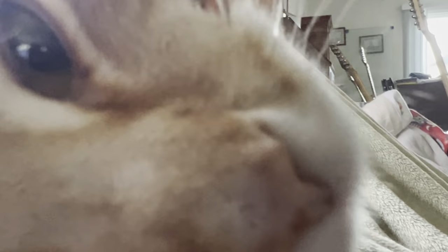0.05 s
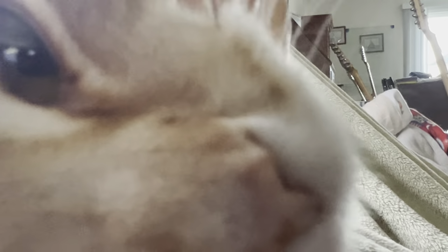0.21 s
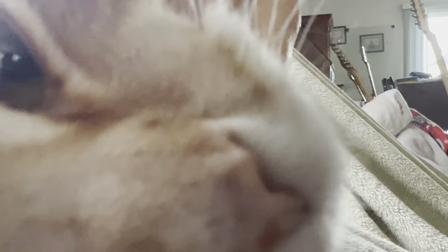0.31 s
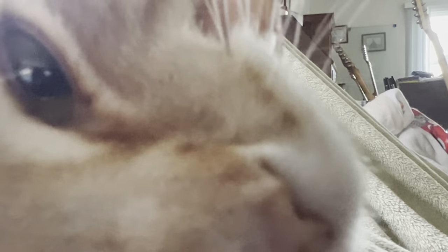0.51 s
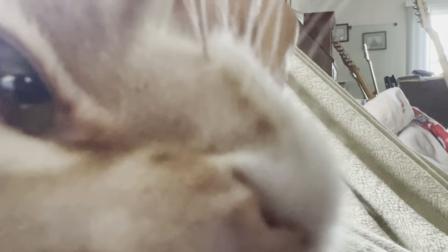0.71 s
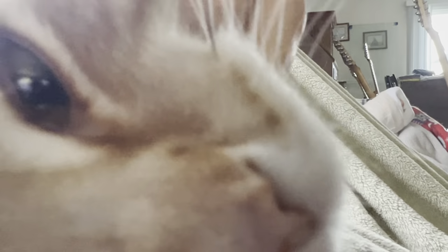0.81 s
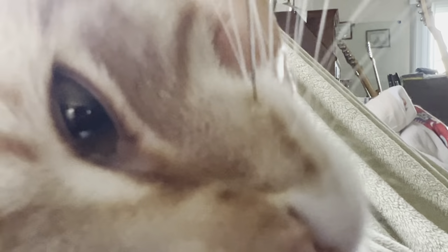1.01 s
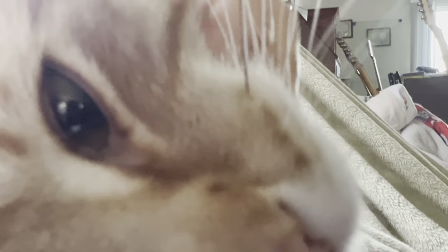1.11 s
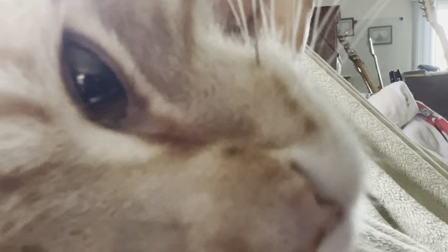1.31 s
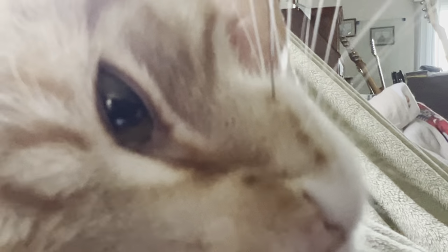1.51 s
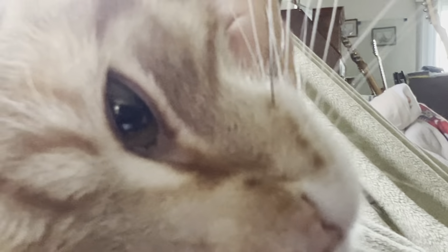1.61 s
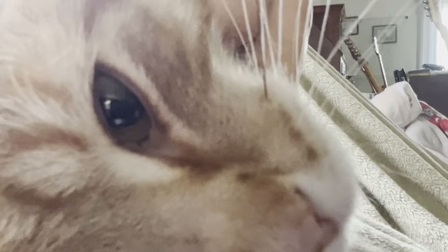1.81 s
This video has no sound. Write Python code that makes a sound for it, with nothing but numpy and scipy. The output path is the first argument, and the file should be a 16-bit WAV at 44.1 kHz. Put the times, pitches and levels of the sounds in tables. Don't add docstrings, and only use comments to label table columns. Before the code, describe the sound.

A cat purrs with its muzzle at the microphone: a soft bump, then a rapid low throaty rattle that fades within a second, a pause with faint sniffing and room rumble, then a short weaker purr.

```python
import sys
import numpy as np
from scipy import signal
from scipy.fft import rfft, irfft, next_fast_len
from scipy.io import wavfile
from scipy.ndimage import uniform_filter1d

SR = 44100
rng = np.random.default_rng(int(sys.argv[2]) if len(sys.argv) > 2 else 0)


def store_wav(level_fs):
    pcm = np.round(np.clip(np.atleast_2d(level_fs), -1, 1) * 32767)
    wavfile.write(sys.argv[1], SR, pcm.T.astype(np.int16))


def magnitude_from_level(level_db):
    exponent = np.asarray(level_db, float) / 20
    return 10 ** exponent


N = 83790
T = np.arange(N) / SR

# f/Hz, level/dB per Hz
ROOM_SPECTRUM = [(12, -35), (20, -11.5), (60, -1), (139, -8), (240, -14), (345, -19), (775, -37),
                 (967, -32.5), (2500, -45.5), (3250, -44.5), (5500, -120)]
# f/Hz, left minus right/dB
ROOM_BALANCE = [(60, 1.5), (200, 3), (700, 1.5), (1300, 0), (2400, 2.5)]
# f/Hz, left minus right/dB
CAT_BALANCE = [(60, 0), (125, 2), (300, 2), (600, 8), (1100, 7.5), (2000, 4), (4000, 2), (8000, 0)]
# f/Hz, lead of right port/rad
PORT_PHASE = [(1500, 0), (3000, 1.1), (4600, .35), (7300, .15), (8600, 1.6), (9600, 3.0), (10600, 3.3),
              (13000, 6.1), (14200, 6.6), (15700, 8.6)]
# peak t/s, level/dB, rise to peak from -20 dB/s, fall by 20 dB/s
SNIFFS = [(-.01, -67.5, 0.033, 0.099), (.2, -68, 0.058, 0.073), (0.272, -62, 0.075, 0.15),
          (0.502, -63, 0.16, 0.12), (0.713, -62.5, 0.11, 0.1), (.94, -64, 0.059, 0.092),
          (1.158, -66, 0.078, 0.13), (1.434, -69, 0.092, 0.1), (1.689, -69.5, 0.076, 0.12),
          (1.91, -81.5, 0.12, .1)]
# f/Hz, level/dB per Hz
SNIFF_SPECTRUM = [(1800, -8), (2500, -9.5), (5000, -15), (7500, -13.5), (9000, -8.5), (11500, -5),
                  (14000, -13.5), (15700, -1.5)]
# t/s, level/dB, f/Hz
THUMPS = [
    (.2325, -20, 192),
    (.170, -65, 100),
    (.526, -42, 125),
    (1.829, -42, 39),
    (1.7, -58, 230),
]
# t/s, level/dB
TICKS = [
    (0.167, -60),
    (0.667, -62),
    (1.426, -77),
    (1.8985, -55),
]
# t/s, level/dB
CHEST_LEVEL = [(0.12, -61.5), (0.308, -42.5), (0.494, -37), (0.512, -37.5), (0.706, -54), (0.762, -49),
               (0.8, -101)]
# multiple of twitch rate, level/dB, lag/turns
CHEST_ORDERS = [(1.0, -7.5, 0.083), (2.0, 1, 0.16), (3.0, -8, 0.24), (4.0, -11.5, 0.048), (5.0, -9, 0.14),
                (6.0, -2, 0.085)]
# t/s, level/dB
AIRFLOW = [(.15, -71), (.25, -36), (.38, -32.5), (.48, -32), (.6, -35.5), (.66, -34.5), (.72, -43),
           (1.9, -60)]
# f/Hz, width/Hz, level/dB
AIRWAY = [(2040, 310, -24), (3290, 390, -28.5), (4176, 260, -28), (5220, 950, -37.5), (7450, 980, -31),
          (12700, 10000, -49)]
# f/Hz, width/Hz, level/dB
THROAT = [(332, 214.3, -1), (200, 225, -5)]
# f/Hz, width/Hz, level/dB
NOSE = [(769.5, 167, -5.5), (1088, 300, -12.5), (633, 203, -4.5)]
# first twitch t/s, twitch period/s, twitches
BREATHS = [
    (0.154, .0311, 19),
    (1.797, .034, 3),
]
# t/s, flutter f/Hz, throat level/dB, nose level/dB, open share of period
VOICE = [
    [(.15, 649, -60, -61.5, 0.67), (.19, 774.6, -60, -55.5, 0.4), (.222, 635, -73, -53.5, .4),
     (.246, 430.5, -31.5, -44.5, .95), (.285, 329.4, -30.5, -48.5, .95), (.5, 344.8, -34.5, -53.5, 1.05),
     (.6, 320.2, -38, -51.5, .95), (.69, 290.3, -39, -51, .7), (.73, 225.6, -59, -72, 0.9)],
    [(1.79, 490.4, -61, -75, 0.48), (1.84, 506.6, -43, -58.5, 0.47), (1.868, 426.4, -37, -53.5, 0.82),
     (1.9, 389, -58, -93, 0.56)],
]

ROOM_DB, ROOM_PATCHY_DB, ROOM_UNLIKE = -54, -2.5, 0.25
HISS_DB, HISS_CUT_HZ = -91, 1100
OWN_HISS_HZ, OWN_HISS_DB = 9100, 8
SNIFF_UNLIKE, SNIFF_OFFSET_DB, SNIFF_ROUNDNESS = .15, 4.5, 2.2
WHISTLE_HZ, WHISTLE_WIDTH_HZ, WHISTLE_DB = 3370, 210, -80.5
PUFF_HZ, PUFF_S, PUFF_SPREAD_DB, STEADY_AIR = 222.2, .0005, 3.5, .17
OPEN_S, CLOSE_S, LEAK = .007, .011, .06
CALM_OPEN = .6
THIRD_SHORTER, NOSE_SHORTER = .2, 0.059
LEAD_S = .004
UNEVEN = 0.58
SAG_SHARE, SAG_AT = .24, .36
PITCH_JITTER, JITTER_HZ, LEVEL_JITTER_DB = .07, 70.4, 2.0


def rms_one(x):
    return x / np.sqrt(np.mean(x ** 2) + 1e-20)


def at_hz(points, hz):
    table = np.array(points)
    return np.interp(np.log(hz), np.log(table[:, 0]), table[:, 1])


def drift(rate_hz):
    r = np.exp(-2 * np.pi * rate_hz / SR)
    wander = signal.lfilter([1], [1, -2 * r, r * r], rng.standard_normal(N + SR))
    return rms_one(wander[SR:])


def resonate(x, table):
    out = 0
    for k, (hz, width_hz, db) in enumerate(table):
        r = np.exp(-np.pi * width_hz * 1.5 / SR)
        b = (1 - r * r) / 2 * np.array([1, 0, -1])
        a = [1, -2 * r * np.cos(2 * np.pi * hz / SR), r * r]
        once = signal.lfilter(b, a, x + 1e-18)
        out = out + (-1) ** k * magnitude_from_level(db) * signal.lfilter(b, a, once)
    return out


def shape(x, gain):
    size = next_fast_len(N + 4096)
    hz = np.maximum(np.arange(size // 2 + 1) * SR / size, 1)
    return irfft(rfft(x, size) * gain(hz), size)[..., :N]


def placed(x, balance):
    return np.array([shape(x, lambda hz: magnitude_from_level(side * at_hz(balance, hz) / 2)) for side in (1, -1)])


def at_ports(x):
    right = shape(x[1], lambda hz: np.exp(1j * at_hz(PORT_PHASE, hz)))
    return np.array([x[0], right])


def room_rumble():
    def colour(hz):
        return magnitude_from_level(at_hz(ROOM_SPECTRUM, hz)) / (1 + (hz / 2500) ** 4) / (1 + (20 / hz) ** 4)

    def octave(k):
        return lambda hz: np.clip(1 - np.abs(np.log2(hz / 15) - k), 0, 1)

    mid, side = [shape(v, colour) for v in rng.standard_normal((2, N))]
    mid = sum(magnitude_from_level(ROOM_PATCHY_DB * drift(2.7)) * shape(mid, octave(k)) for k in range(10))
    rumble = placed(mid, ROOM_BALANCE) + ROOM_UNLIKE * side * [[1], [-1]]
    return rms_one(rumble) * magnitude_from_level(ROOM_DB)


def microphone_hiss():
    common = rng.standard_normal(N)
    own = shape(rng.standard_normal((2, N)), lambda hz: 1 / (1 + (hz / OWN_HISS_HZ) ** 6))
    highpass = signal.butter(1, HISS_CUT_HZ, "high", fs=SR, output="sos")
    hiss = signal.sosfilt(highpass, common + magnitude_from_level(OWN_HISS_DB) * own)
    return magnitude_from_level(HISS_DB) * at_ports(hiss)


def touches():
    out = np.zeros(N)
    for s, db, hz in THUMPS:
        turns = np.maximum(T - s, 0) * hz
        out -= magnitude_from_level(db) * 8 * turns * turns * np.exp(-3.2 * turns) * np.sin(2 * np.pi * turns)
    band = signal.butter(2, [900, 2800], "band", fs=SR, output="sos")
    noise = signal.sosfilt(band, rng.standard_normal(N))
    for s, db in TICKS:
        out += 3 * magnitude_from_level(db) * noise * (T > s) * np.exp(-np.maximum(T - s, 0) / 0.0017)
    return out


def sniffs():
    def colour(hz):
        ratio = (hz / 2200) ** 2
        return magnitude_from_level(at_hz(SNIFF_SPECTRUM, hz)) * ratio / (1 + ratio)

    power = 0
    for s, db, rise_s, fall_s in SNIFFS:
        away = np.abs((T - s) / np.where(T < s, rise_s, fall_s))
        power = power + magnitude_from_level(db - 20 * away ** SNIFF_ROUNDNESS) ** 2
    air, own = rng.standard_normal(N), rng.standard_normal((2, N))
    noise = rms_one(shape(air + SNIFF_UNLIKE * own, colour))
    return noise * power ** .5 * magnitude_from_level(SNIFF_OFFSET_DB + 0.8 * drift(59))


def whistle(closed):
    tone = rms_one(resonate(rng.standard_normal(N), [(WHISTLE_HZ, WHISTLE_WIDTH_HZ, 0)]))
    return tone * uniform_filter1d(closed, size=150) ** 3 * magnitude_from_level(WHISTLE_DB)


def chest():
    first_s, period_s, _ = BREATHS[0]
    s, db = np.transpose(CHEST_LEVEL)
    fade = np.clip(np.minimum(T - s[0], s[-1] - T) / 0.059, 0, 1)
    level = magnitude_from_level(np.interp(T, s, db, left=-120, right=-120) + 2.0 * drift(12)) * fade
    turns = (T - first_s) / period_s + 0.055 * drift(3.7)
    hum = 0
    for order, order_db, late in CHEST_ORDERS:
        hum = hum + 1.073 * magnitude_from_level(order_db) * np.sin(2 * np.pi * (round(order) * turns - late))
    return level * hum


def nasal_puffs(gate):
    s, db = np.transpose(AIRFLOW)
    cycles = np.cumsum(PUFF_HZ * np.exp(.15 * drift(40))) / SR
    strength = magnitude_from_level(PUFF_SPREAD_DB * rng.standard_normal(2000))[cycles.astype(int)]
    decay = np.exp(-(cycles % 1) / PUFF_HZ / PUFF_S)
    puffs = strength * decay * rng.standard_normal(N) + STEADY_AIR * rng.standard_normal(N)
    return resonate(puffs * gate * magnitude_from_level(np.interp(T, s, db) + 12.0), AIRWAY)


def purr_breath(first_s, period_s, count, voice):
    s, *columns = np.transpose(voice)
    pitch_hz, throat_db, nose_db, share = [np.interp(T, s, c) for c in columns]
    long = count > 5
    progress = np.clip((T - first_s) / period_s / count, 0, 1)
    wild = long * np.clip((T - first_s) / period_s - 3.2, .15, 1) + .1

    turns = (T - first_s + long * LEAD_S * np.sin(np.pi * progress ** 1.5)) / period_s
    active = (turns >= 0) & (turns < count)
    third = np.floor(turns) % 3 == 0
    share = np.clip(share, .1, 1.1) * (1 - long * THIRD_SHORTER * third)
    since_s, span_s = turns % 1 * period_s, share * period_s
    open_s = OPEN_S * (CALM_OPEN + (1 - CALM_OPEN) * wild)

    def opening(end_s):
        edge = np.clip(np.minimum(since_s / open_s, (end_s - since_s) / CLOSE_S), 0, 1)
        return active * (LEAK * wild + np.sin(np.pi / 2 * edge) ** 2)

    gate, nose_gate = opening(span_s), opening(span_s * (1 - NOSE_SHORTER))

    sag = 1 - wild * SAG_SHARE * np.cos(2 * np.pi * (np.clip(since_s / span_s, 0, 1) - SAG_AT))
    jitter = np.exp(wild * (.5 + progress) * PITCH_JITTER * drift(JITTER_HZ))
    cycles = np.cumsum(pitch_hz * sag * jitter) / SR
    saw = 1 - 2 * (cycles % 1)
    half_rate_saw = 1 - 2 * (cycles / 2 % 1)
    flow = saw + long * UNEVEN * progress ** 0.99 * 2 * half_rate_saw
    flow = flow * magnitude_from_level(LEVEL_JITTER_DB * drift(135))

    throat = resonate(flow * gate * magnitude_from_level(throat_db + 8.0), THROAT)
    nose = resonate(flow * nose_gate * magnitude_from_level(nose_db + 17.5), NOSE)
    closed = (turns > -.3) * (turns < count) * (1 - gate)
    return throat + nose, gate, closed


def scene():
    breaths = []
    for (first_s, period_s, count), voice in zip(BREATHS, VOICE):
        breaths.append(purr_breath(first_s, period_s, int(round(count)), voice))
    (first, gate, _), (second, _, closed) = breaths
    cat = first + second + whistle(closed) + chest() + touches()
    air = placed(nasal_puffs(gate), CAT_BALANCE) + sniffs()
    return placed(cat, CAT_BALANCE) + at_ports(air) + room_rumble() + microphone_hiss()


def band_limit(x):
    return signal.sosfilt(signal.butter(12, 15690, fs=SR, output="sos"), x)


def record(dry):
    return band_limit(dry)


dry = scene()
out = record(dry)
store_wav(out)
```